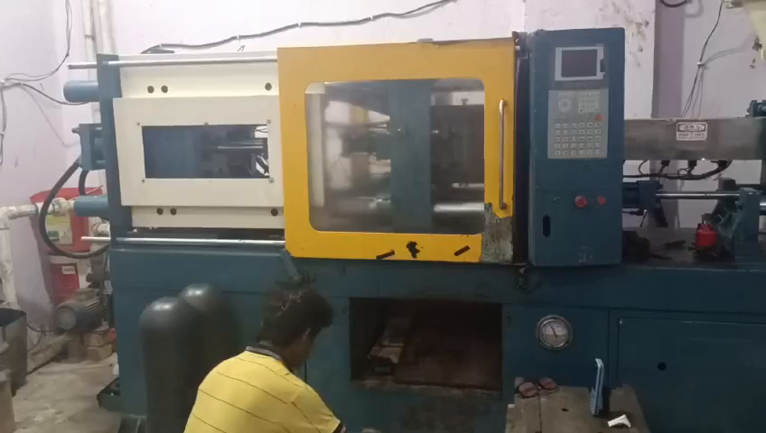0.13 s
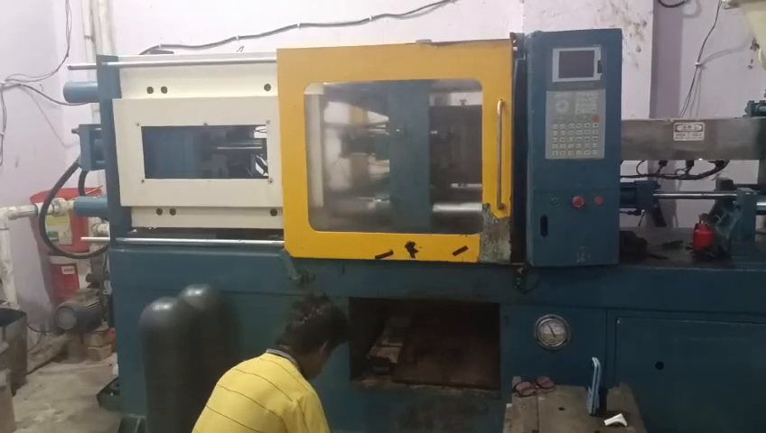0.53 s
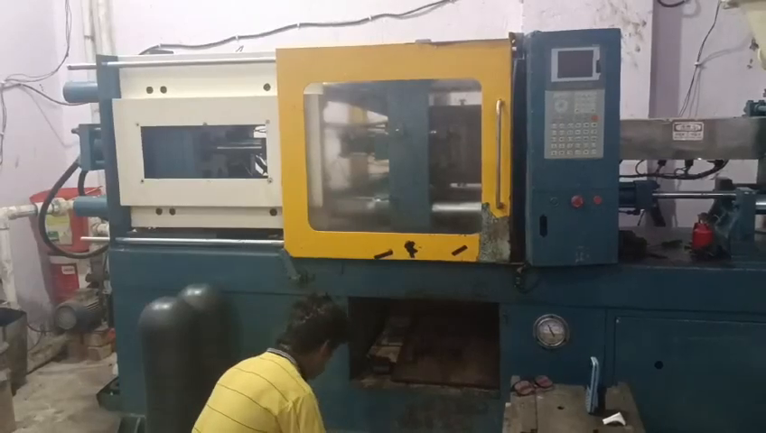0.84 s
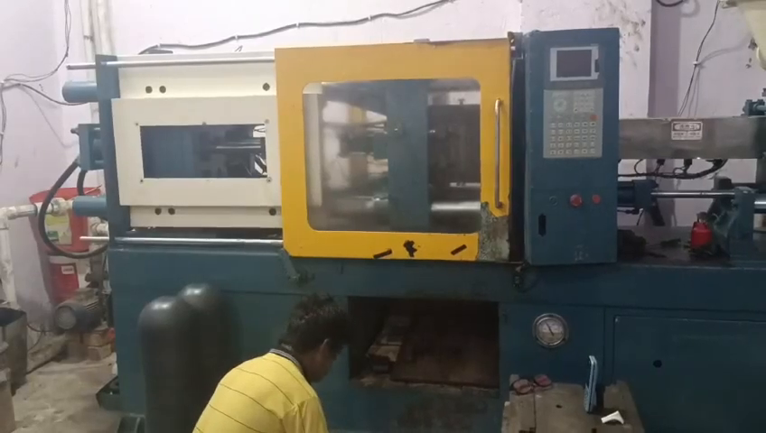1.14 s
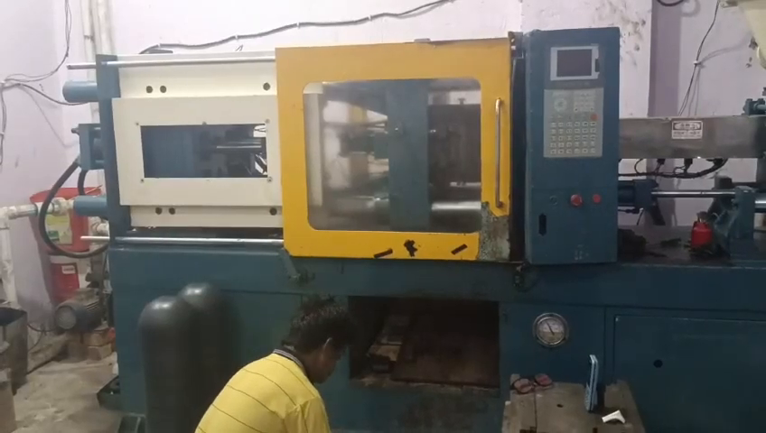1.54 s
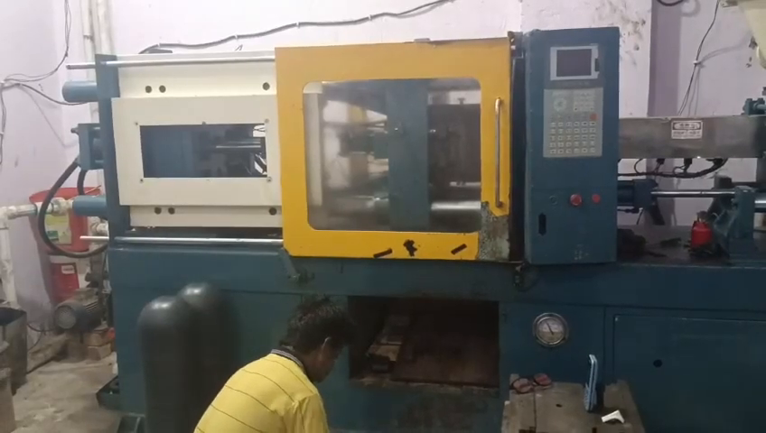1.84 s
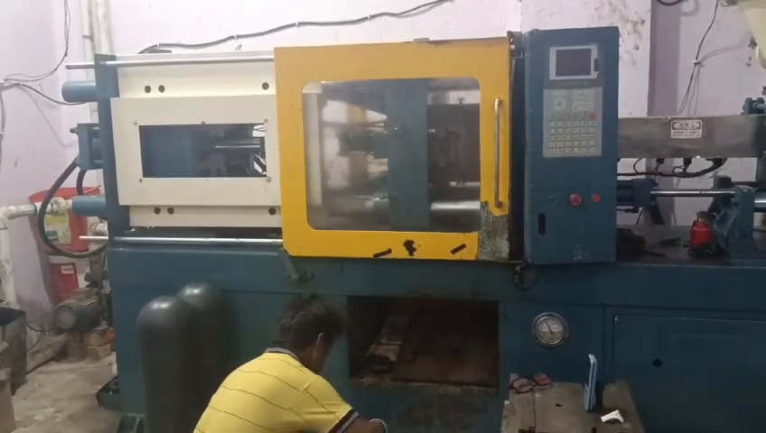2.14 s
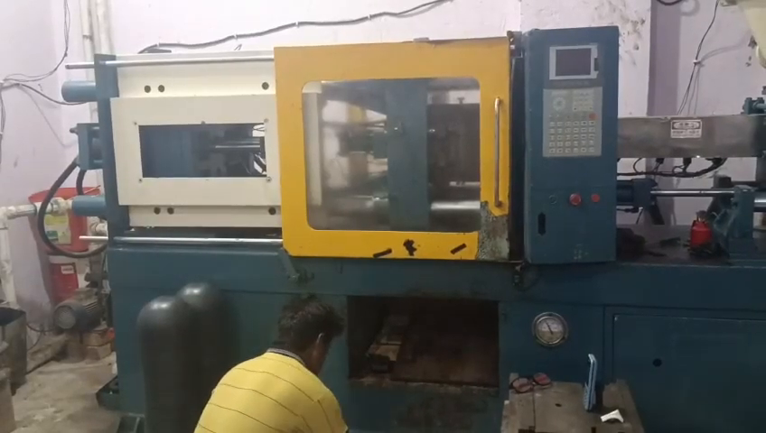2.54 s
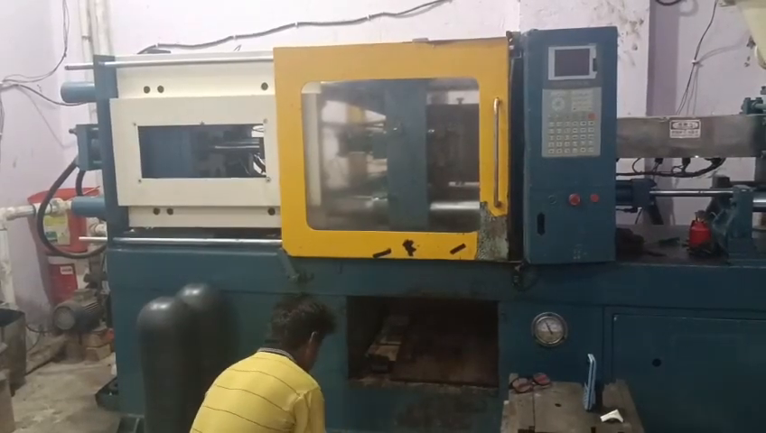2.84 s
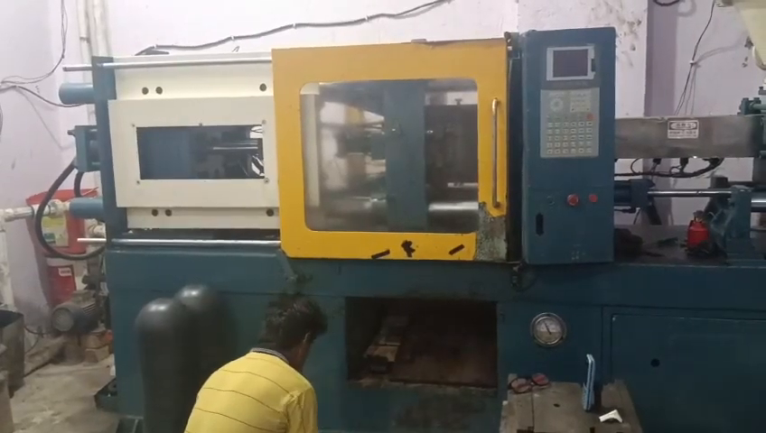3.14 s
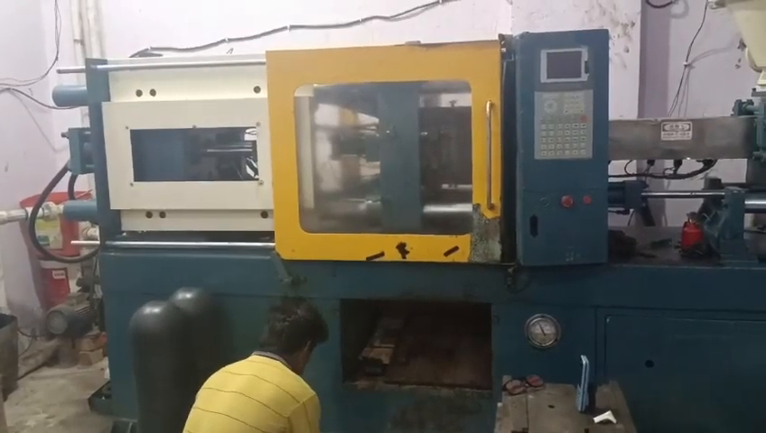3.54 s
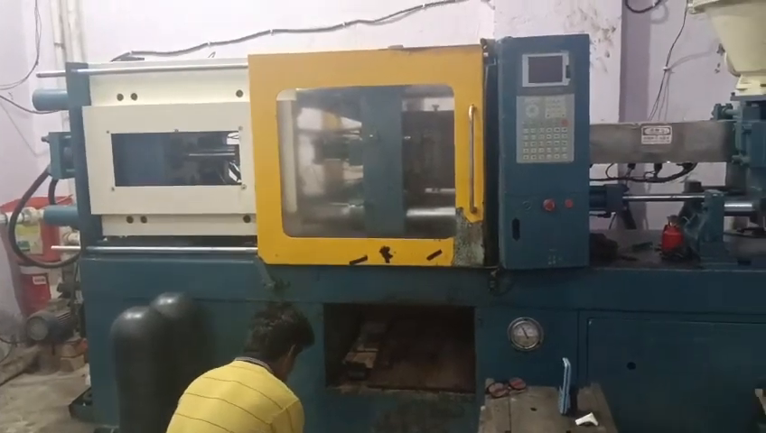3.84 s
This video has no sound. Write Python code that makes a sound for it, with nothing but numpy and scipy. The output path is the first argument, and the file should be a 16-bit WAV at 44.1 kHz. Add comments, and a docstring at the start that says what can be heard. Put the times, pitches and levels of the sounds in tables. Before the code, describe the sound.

Sharp steel knocks in a hard-walled workshop: a bright ringing clink, then a louder, lower clank that chatters, over steady machine hum and hiss; finally a heavy scuffing shift with dull bumps, caught by a phone.

```python
"""Steel is struck twice in a hard-walled hall: a bright clink, then a lower, harder clank that chatters.
Each contact sets off the part's resonances, a bright snap and the hall's echo; some tones ring on longer.
An injection moulding machine runs underneath: steady tones hum and whine, shaped noise roars and hisses.
Later something heavy shifts: noise rumbles, scuffs and rasps, and short low rings make dull bumps.
The phone's gain control ducks at loud blows and creeps back."""
import sys
import numpy as np
from scipy import signal
from scipy.fft import rfft, irfft
from scipy.io import wavfile
from scipy.ndimage import uniform_filter1d, minimum_filter1d

SR = 44100
rng = np.random.default_rng(int(sys.argv[2]) if len(sys.argv) > 2 else 0)


def output_pcm(signal):
    """Save a mono or channel-first signal as 16-bit PCM at the path in sys.argv[1].

    Samples are clipped to [-1, 1] before scaling.
    """
    pcm = np.clip(np.atleast_2d(signal).T, -1, 1) * 32767
    wavfile.write(sys.argv[1], SR, np.round(pcm).astype(np.int16))


N = 176400
T = np.arange(N) / SR  # time in seconds
HZ = np.maximum(np.arange(N // 2 + 1) * SR / N, 1)  # pitch of each spectrum bin, kept above zero


def undb(db):
    """Turn decibels into a gain."""
    return 10 ** (np.asarray(db) / 20)


def unit(x):
    """Scale a sound to an rms of 1."""
    return x / np.sqrt(np.mean(x ** 2))


def curve(points, hz=HZ):
    """Read a value between (pitch, value) points, on a log-pitch axis."""
    point_hz, values = np.array(points).T
    return np.interp(np.log(hz), np.log(point_hz), values)


def over_time(points):
    """Read a value between (time, value) points at every sample."""
    return np.interp(T, *np.array(points).T)


def pan(db):
    """Left and right gains for a level difference, left minus right."""
    return undb(np.array([[1], [-1]]) * db / 2)


def walk(rate):
    """Smooth random wander with an rms of 1, drawing about `rate` new values per second."""
    hold = int(SR / rate)
    steps = np.repeat(rng.standard_normal(N // hold + 1), hold)
    smooth = uniform_filter1d(uniform_filter1d(steps, hold), hold)
    return unit(smooth[:N])


def octaves(count=10):
    """Centres and shapes of overlapping octave bands that sum to one."""
    centres = SR / 2 ** np.arange(count, 0, -1)
    return [(c, np.interp(np.log(HZ), np.log(centres), row)) for c, row in zip(centres, np.eye(count))]


# How alike the sound is at the two microphone ports: pitch_hz, correlation (no unit)
PORT_LIKENESS = [(100, 1), (350, 0.92), (700, 0.41), (1200, 0), (15000, 0)]


def diffuse():
    """Spectra of noise from all around at two ports: alike in the bass, unrelated in the treble."""
    mid, side = rfft(rng.standard_normal((2, N)))
    alike = np.clip(curve(PORT_LIKENESS), -1, 1)
    shared = mid * np.sqrt((1 + alike) / 2)
    opposed = side * np.sqrt((1 - alike) / 2)
    return shared + np.array([[1], [-1]]) * opposed


# Time the hall's echo takes to fall 60 dB: pitch_hz, t60_s
HALL_DECAY = [(100, 0.55), (700, 0.98), (2000, 0.52), (3500, 0.99), (7000, 0.49), (14000, 0.28)]
NEAR_ECHO_DB, NEAR_ECHO_S = -0.5, 0.0031  # reflections off the machine's own panels
ECHO_LUMP_DB, ECHO_LUMPS_PER_S = 0.5, 260


def hall():
    """Spectra of the hall's echo: near panels answer first, then lumpy wall echoes with their own decays."""
    noise = diffuse()
    tail = 0
    for hz, band in octaves():
        tail = tail + irfft(noise * band, N) * np.exp(-np.log(1000) * T / curve(HALL_DECAY, hz))
    lumps = undb(ECHO_LUMP_DB * walk(ECHO_LUMPS_PER_S))
    near_panels = undb(NEAR_ECHO_DB) * np.exp(-T / NEAR_ECHO_S)
    return rfft(tail * (lumps + near_panels))


CRACK_HZ = 4300  # the crack of a contact fades above this pitch


def ring(modes, crack=0):
    """Spectrum of a struck body's ring, of unit energy: resonances plus the broad crack of the contact."""
    power = 0
    for f, width, db in modes:
        detune = f / width * (HZ / f - f / HZ)
        power = power + undb(db) ** 2 / (1 + detune ** 2) ** 3
    power = power + crack ** 2 / (1 + (HZ / CRACK_HZ) ** 4) * HZ / (HZ + CRACK_HZ / 10)
    # Folding the cepstrum picks the phase that makes the ring start at the blow, not before it
    cepstrum = irfft(np.log(power + 1e-12) / 2, N)
    cepstrum[1:N // 2] *= 2
    cepstrum[N // 2 + 1:] = 0
    return np.exp(rfft(cepstrum)) / np.sqrt(np.mean(power))


DIRECT_DB, DIRECT_PAN_DB = -9.5, 1.5  # direct sound against the echo; left minus right
DIRECT_TOP_HZ = 9000  # the direct path is partly screened
PORT_LAG_S = .0001  # the right port hears direct sound this much later
BLOW_S = .05  # a blow's level sets its echo's energy, spread over this time as rms


def strike(body, start, db, pan_db=0, direct_db=0):
    """One contact, heard directly and through the hall."""
    echo = unit(irfft(body * hall(), N)) / np.sqrt(N)
    lag = np.exp(-2j * np.pi * HZ * np.array([[0], [PORT_LAG_S]]))
    direct = irfft(body * lag / (1 + 1j * HZ / DIRECT_TOP_HZ), N)
    sound = echo * pan(pan_db) + undb(DIRECT_DB + direct_db) * pan(DIRECT_PAN_DB) * direct
    placed = np.pad(sound, ((0, 0), (int(start * SR), 0)))[:, :N]
    return undb(db) * np.sqrt(BLOW_S * SR) * placed


# Left-right balance of the machine: pitch_hz, left_minus_right_db
MACHINE_BALANCE = [(200, 0.5), (700, -0.5), (1300, -2.5), (2400, -4.5), (4400, -9), (15000, -4.5)]
HUM_WAVER_DB, HUM_ROUGH_PER_S = 0.64, 30


def tones(lines, drift, rough_db=0):
    """Steady tones that waver in level and pitch; rough_db adds a quicker flutter to each."""
    out = 0
    for hz, db in lines:
        wandering_hz = hz * (1 + drift * walk(5.03))
        phase = 2 * np.pi * np.cumsum(wandering_hz) / SR + rng.uniform(0, 2 * np.pi)
        waver_db = HUM_WAVER_DB * walk(5.8) + rough_db * walk(HUM_ROUGH_PER_S)
        tone = np.sqrt(2) * undb(db + waver_db) * np.sin(phase)
        out = out + tone * pan(curve(MACHINE_BALANCE, hz))
    return out


# Colour of the machine's roar and hiss, relative: pitch_hz, level_db (per Hz)
ROAR_COLOUR = [(25, -28), (45, -12), (75, -5.5), (105, -2.5), (150, -1), (200, -1), (330, -1), (400, -8.5),
               (520, -8), (600, -15), (1000, -11), (1450, -17), (1950, -13.5), (2400, -16.5), (3000, -11.5),
               (3600, -15), (4100, -26), (5200, -24), (6900, -24), (7600, -33), (9000, -45.5),
               (11000, -45.5), (13000, -32.5), (14600, -39)]
# Change of the roar's bass over time: time_s, change_db
BASS_CHANGE = [(.2, 1), (.37, 6), (.6, -3), (.85, -4), (1.5, -3.5), (2.5, -4), (3.18, -7), (3.9, 7.5)]
BASS_HZ = 125  # the bass lies below this
FLICKER_DB = 0.99  # random level change in each octave


def roar_and_hiss():
    """Low roar and the hiss of oil: shaped noise that flickers octave by octave, with changing bass."""
    noise = diffuse() * undb(curve(ROAR_COLOUR)) * pan(curve(MACHINE_BALANCE))
    roar = unit(sum(irfft(noise * band, N) * undb(FLICKER_DB * walk(16)) for hz, band in octaves()))
    bass = irfft(rfft(roar) / (1 + (HZ / BASS_HZ) ** 8), N)
    return roar + bass * (undb(over_time(BASS_CHANGE)) - 1)


# Motor and pump tones, before balance and the machine's level: pitch_hz, level_db (rms)
HUM_TONES = [(78.5, -47), (140, -38.5), (156, -36.5), (233, -48), (263.9, -31), (300.3, -39.5), (311, -46),
             (314.5, -47), (329, -44), (343.2, -28.5), (500.6, -45), (686, -49.5), (736, -51.5)]
# Whine of the drive, before balance and the machine's level: pitch_hz, level_db (rms)
WHINE_TONES = [(6868, -52), (7131, -63)]
# Level of the whole machine, which steps down a little after a second: time_s, level_db
MACHINE_LOUDNESS = [(.152, -44.5), (.172, -7), (.29, 0), (.6, 2), (1.065, 1.4), (1.1, -1.5), (1.8, -1),
                    (2.5, -3.5), (3.1, -4), (4, -3.5)]
ROAR_DB, HUM_ROUGH_DB = -26.5, 1.4
HUM_DRIFT, WHINE_DRIFT = 0.002026, 0.000281  # pitch wander, as a share of the pitch


def machine():
    """Motor and pump tones and the drive's whine over roar and hiss, all sharing one level."""
    hum = tones(HUM_TONES, HUM_DRIFT, HUM_ROUGH_DB)
    whine = tones(WHINE_TONES, WHINE_DRIFT)
    running = undb(ROAR_DB) * roar_and_hiss() + hum + whine
    return running * undb(over_time(MACHINE_LOUDNESS)) * (T > MACHINE_LOUDNESS[0][0])


SCUFF_START_S, SCUFF_END_S, SCUFF_ATTACK_S, SCUFF_RELEASE_S = 3.435, 3.64, 0.052, 0.08
# Colour of the moving weight's rumble, relative: pitch_hz, level_db (per Hz)
RUMBLE_COLOUR = [(25, -26), (45, -6), (75, 2.5), (110, -3), (190, 1.5), (300, -8.5), (600, -25.5),
                 (2000, -57)]
RUMBLE_PEAK_DB, RUMBLE_RISE_DB_PER_S, RUMBLE_FALL_DB_PER_S = -21, 41, 138


def rumble():
    """Low noise that swells as the weight moves and dies once it settles."""
    rise_db = RUMBLE_RISE_DB_PER_S * np.maximum(SCUFF_END_S - T, 0)
    fall_db = RUMBLE_FALL_DB_PER_S * np.maximum(T - SCUFF_END_S, 0)
    noise = unit(irfft(diffuse() * undb(curve(RUMBLE_COLOUR)), N))
    return undb(RUMBLE_PEAK_DB - rise_db - fall_db) * noise


# Colour of the scuffing between the bumps, relative: pitch_hz, level_db (per Hz)
SCUFF_COLOUR = [(25, -26), (45, 1), (85, -4), (200, 4), (320, -13), (480, -3), (650, -12.5), (1100, -12),
                (1500, -18.5), (2100, -18.5), (3300, -23.5), (4300, -34), (5500, -29), (8000, -56),
                (14000, -51)]
SCUFF_START_DB, SCUFF_SWELL_DB_PER_S = -23, 20  # level before the fade in and out


def scuff():
    """Rubbing noise that grows harder while the weight slides, then fades."""
    fade_in = np.clip((T - SCUFF_START_S) / SCUFF_ATTACK_S, 0, 1)
    fade_out = np.exp(-np.maximum(T - SCUFF_END_S, 0) / SCUFF_RELEASE_S)
    effort_db = SCUFF_START_DB + SCUFF_SWELL_DB_PER_S * (np.minimum(T, SCUFF_END_S) - SCUFF_START_S)
    noise = unit(irfft(diffuse() * undb(curve(SCUFF_COLOUR)), N))
    return undb(effort_db) * fade_in * fade_out * noise


# Rasps of the sliding surface: middle_s, length_s, level_db
RASPS = [(3.548, 0.043, -31.5), (3.592, .02, -34)]
# Colour of the rasps, relative: pitch_hz, level_db (per Hz)
RASP_COLOUR = [(500, -20), (2300, -12), (3100, 6), (4300, -7), (5500, -10), (8000, -29), (14000, -30)]
GRIT_DB, GRIT_PER_S = 3, 370


def scrapes():
    """Short gritty rasps where the sliding surface catches: noise with a fast, rough level."""
    noise = irfft(diffuse() * undb(curve(RASP_COLOUR)), N)
    grit = unit(noise * undb(GRIT_DB * walk(GRIT_PER_S)))
    return grit * sum(undb(db) * np.exp(-((T - middle) / (length / 2)) ** 2) for middle, length, db in RASPS)


# Dull bumps of the weight: start_s, level_db (of the echo), pitch_hz
BUMPS = [(3.438, -25.5, 100), (3.46, -23.5, 430), (3.484, -22, 75), (3.536, -19.5, 150), (3.583, -18, 268),
         (3.596, -26, 72), (3.606, -17, 195)]
BUMP_WIDTH = 0.83  # width of the resonance, as a share of the pitch
BUMP_DIRECT_DB = 3  # extra direct sound


def bumps():
    """Dull bumps: each strikes one broad, low resonance that dies at once."""
    return sum(strike(ring([(hz, hz * BUMP_WIDTH, 0)]), start, db, direct_db=BUMP_DIRECT_DB)
               for start, db, hz in BUMPS)


def heavy_shift():
    """Something heavy rumbles and scuffs along, rasps, and settles in a few bumps."""
    return rumble() + scuff() + scrapes() + bumps()


# Colour of a contact's bright snap, relative: pitch_hz, level_db (per Hz)
SNAP_COLOUR = [(1500, -26), (3500, 11), (5000, 6), (6300, -4.5), (8000, -18), (9300, -32), (12500, -26),
               (15000, -24)]
SNAP_DECAY_S = 0.0067


def snap(start, db):
    """The hard edge of a contact: a few milliseconds of bright crackle."""
    age = np.maximum(T - start, 0)
    crackle = unit(irfft(rfft(rng.standard_normal(N)) * undb(curve(SNAP_COLOUR)), N))
    return undb(db) * crackle * np.exp(-age / SNAP_DECAY_S) * (age > 0) * pan(DIRECT_PAN_DB)


REBOUND_DIRECT_DB = -5  # rebounds reach the phone mostly by way of the hall


def knock(modes, rings, contacts, level_db, crack_db, pan_db):
    """Steel meets steel and rebounds; every contact excites the same resonances, and a few modes ring on."""
    body = ring(modes, undb(crack_db))
    sound = 0
    for k, (start, db, snap_db) in enumerate(contacts):
        direct_db = REBOUND_DIRECT_DB if k > 0 else 0
        sound = sound + strike(body, start, level_db + db, pan_db, direct_db) + snap(start, snap_db)
    age = np.maximum(T - contacts[0][0], 0)
    ringing = 0
    for hz, db, t60 in rings:
        decay = np.exp(-np.log(1000) * age / t60)
        wave = np.sin(2 * np.pi * hz * age + rng.uniform(0, np.pi, (2, 1)))
        ringing = ringing + undb(level_db + db) * decay * wave
    return sound + ringing * (age > 0) * pan(pan_db)


# Resonances of the bright steel part, relative: pitch_hz, width_hz, level_db
BRIGHT_MODES = [(470, 210, -14.5), (770, 220, -13.5), (1170, 480, -10.5), (2840, 720, -8.5),
                (3103, 100, -2), (3290, 150, -1.5), (3510, 340, 1), (3720, 340, -2), (4160, 190, -4),
                (4980, 780, -17.5), (5970, 1100, -23.5), (6960, 670, -24), (7980, 570, -27),
                (12240, 3700, -38.5)]
# Longer rings of the bright part: pitch_hz, level_db (relative to the knock), t60_s
BRIGHT_RINGS = [(2842, -12, .35), (3150, -7, .7), (3410, -21, 0.38), (3425, -22, 0.62), (3467, -7.5, 0.68),
                (3600, -14, 0.96), (3690, -15, 0.84), (3693, -20, .9), (4221, -24, .4)]
# Contacts on the bright part: start_s, level_db (relative to the knock), snap_level_db
BRIGHT_CONTACTS = [(1.8824, -0.4, -15), (1.9015, -4, -29)]


def bright_clink():
    """A bright steel part is struck and rebounds once."""
    return knock(BRIGHT_MODES, BRIGHT_RINGS, BRIGHT_CONTACTS, level_db=-11.5, crack_db=-35, pan_db=-5)


# Resonances of the low steel part, relative: pitch_hz, width_hz, level_db
LOW_MODES = [(638, 150, -20.5), (775, 277, -16), (1860, 220, -6), (1977, 214, 2), (2130, 200, -1),
             (2217, 140, -4), (2387, 180, -5), (2550, 140, -7), (2760, 310, -12), (3080, 430, -18),
             (3590, 450, -19.5), (4510, 710, -27), (5080, 940, -24), (6680, 1400, -37),
             (12950, 4100, -39.5)]
# Longer rings of the low part: pitch_hz, level_db (relative to the knock), t60_s
LOW_RINGS = [(1866, -19, 0.7), (1970, -19.5, 1.56), (1974, -12, 1.1), (2020, -26, 0.89), (2158, -24, 0.83),
             (2550, -24, 0.63), (2565, -18, 0.51)]
# Contacts on the low part: start_s, level_db (relative to the knock), snap_level_db
LOW_CONTACTS = [(2.6082, -0.5, -34), (2.626, -1.5, -31), (2.645, -6.5, -36), (2.672, -4, -21),
                (2.69, -6, -30), (2.731, -13.5, -36)]


def low_clank():
    """A lower steel part is struck harder and chatters through several rebounds."""
    return knock(LOW_MODES, LOW_RINGS, LOW_CONTACTS, level_db=-3.5, crack_db=-46, pan_db=-4)


def scene():
    """The running machine, the heavy shift and the two knocks."""
    return machine() + heavy_shift() + bright_clink() + low_clank()


CEILING_DB, SENSE_S, REACT_S, RECOVER_DB_PER_S = -8.8, 0.023, 0.0104, 2.5
PEAK_LIMIT, LIMIT_S = 0.97, 0.0018
TOP_HZ = 15000


def record(dry):
    """Gain control that ducks just after a loud front and recovers slowly, a peak limiter and a top cut."""
    power = uniform_filter1d(np.mean(dry ** 2, axis=0), max(int(SENSE_S * SR), 1))
    sensed = np.interp(T - REACT_S, T, power)
    over_db = np.maximum(10 * np.log10(np.maximum(sensed, 1e-12)) - CEILING_DB, 0)
    # The deepest duck so far holds, easing off at a steady rate
    duck_db = np.maximum.accumulate(over_db + RECOVER_DB_PER_S * T) - RECOVER_DB_PER_S * T
    ducked = dry * undb(-duck_db)
    span = max(int(LIMIT_S * SR), 1)
    safe_gain = PEAK_LIMIT / np.maximum(np.abs(ducked).max(axis=0), PEAK_LIMIT)
    limited = ducked * uniform_filter1d(minimum_filter1d(safe_gain, span), span)
    top_cut = signal.ellip(8, .2, 70, TOP_HZ, fs=SR, output="sos")
    return signal.sosfilt(top_cut, limited)


dry = scene()
out = record(dry)
output_pcm(out)
```